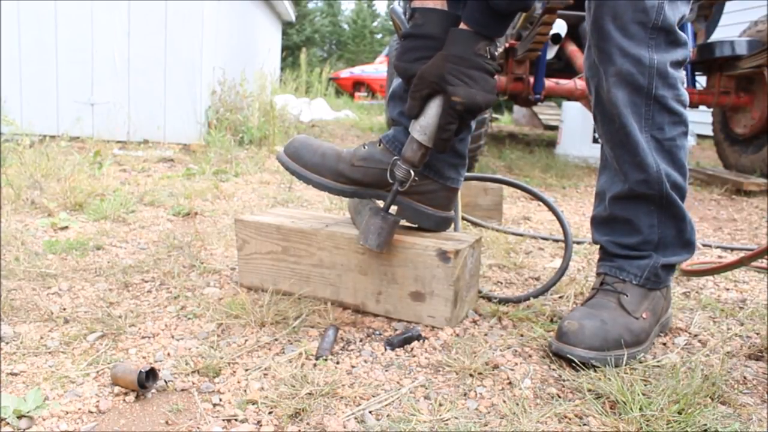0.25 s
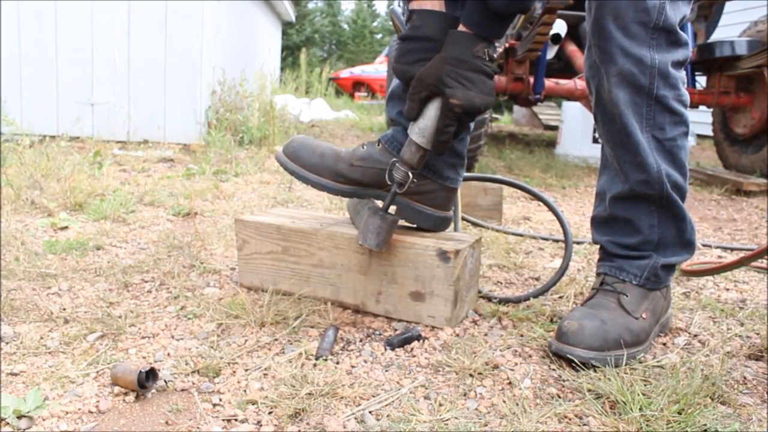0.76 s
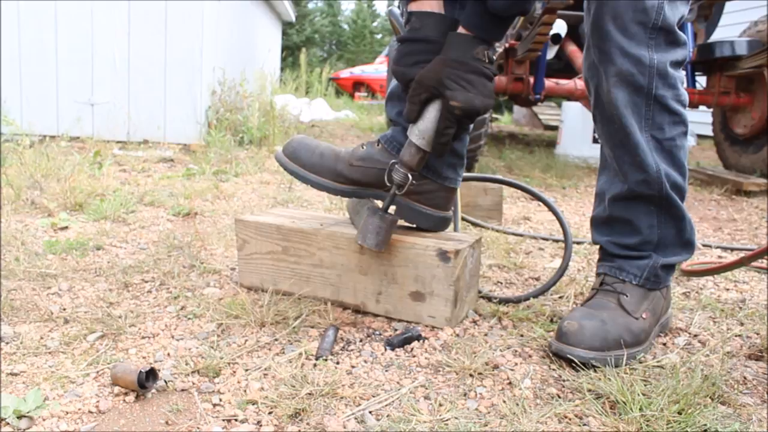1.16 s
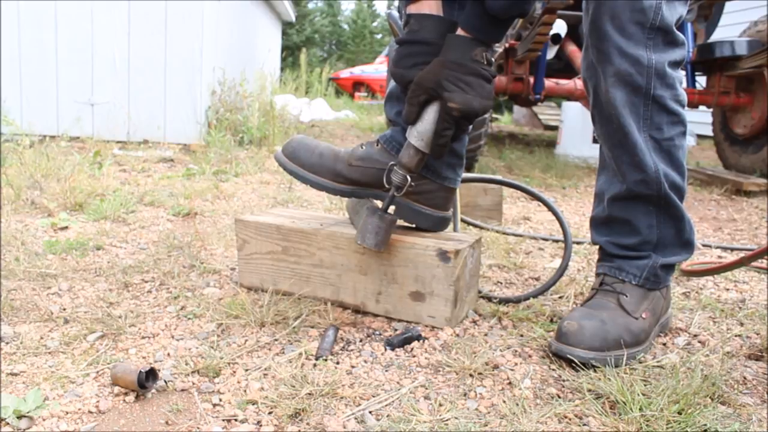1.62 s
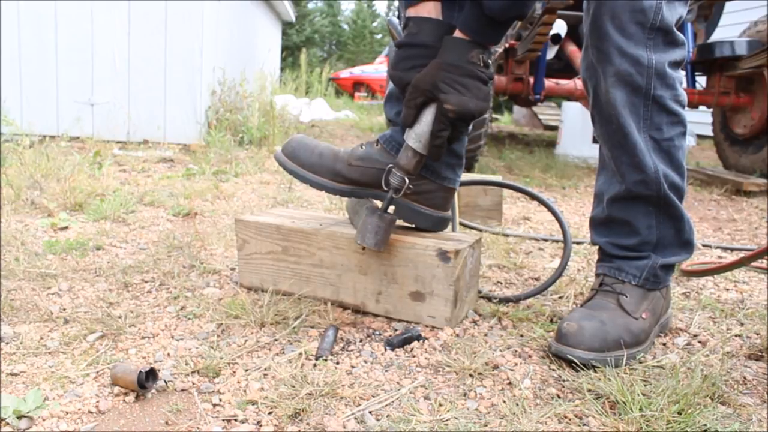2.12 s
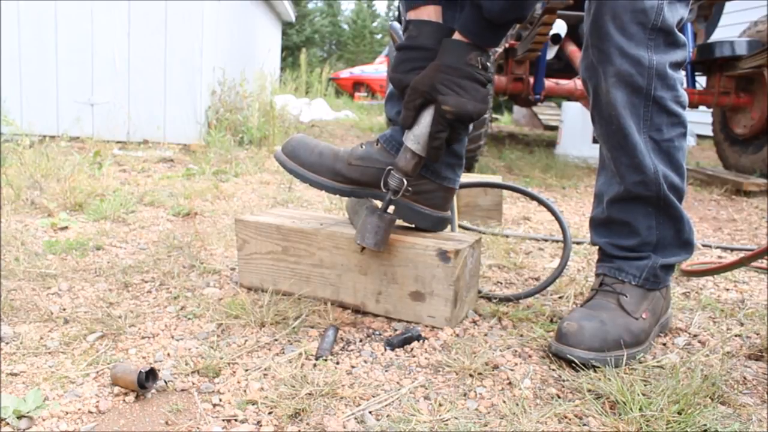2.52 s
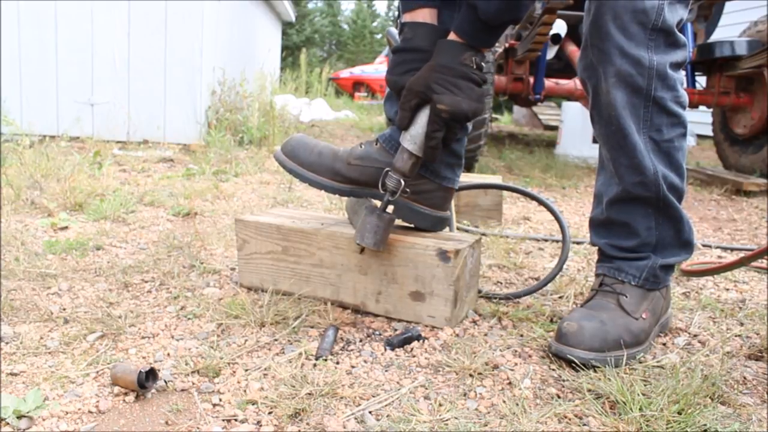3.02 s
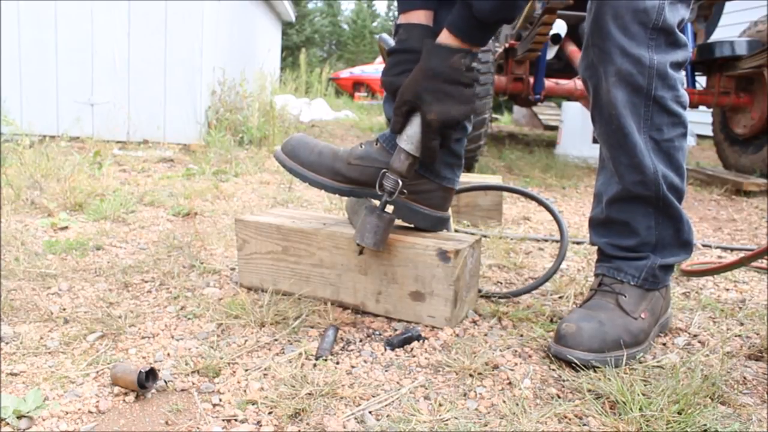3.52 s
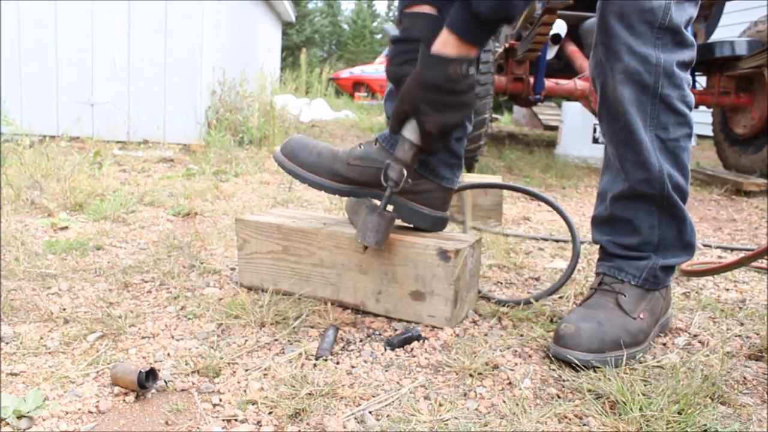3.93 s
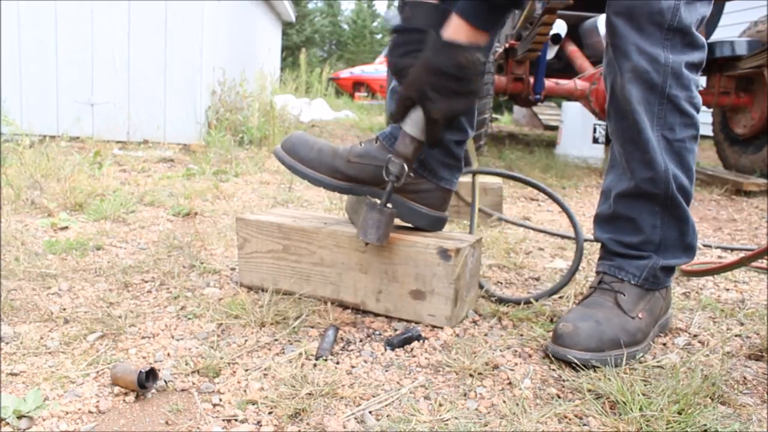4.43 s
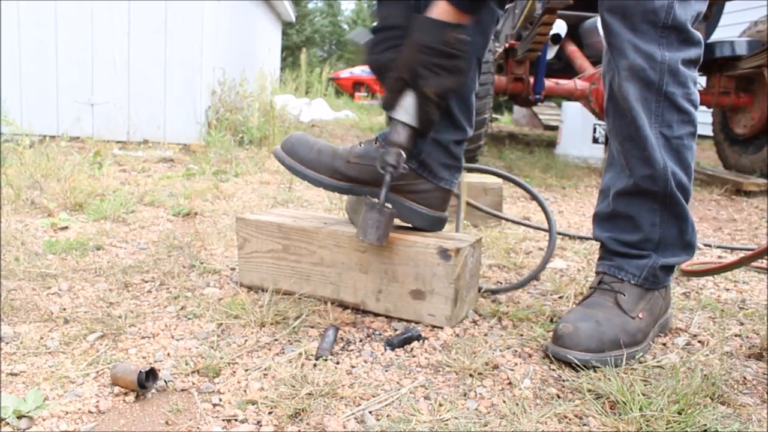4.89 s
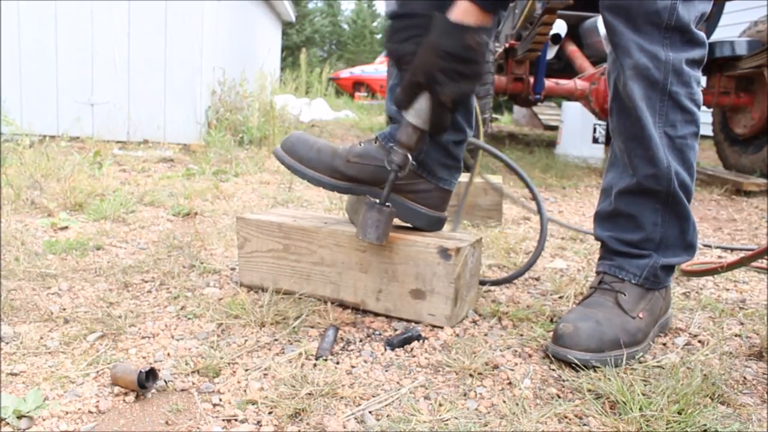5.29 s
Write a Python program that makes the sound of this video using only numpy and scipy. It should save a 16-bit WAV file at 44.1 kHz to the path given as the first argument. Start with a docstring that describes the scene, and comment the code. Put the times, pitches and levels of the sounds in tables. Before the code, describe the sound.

An air chisel hammers metal in one rapid burst outdoors, followed by light tool clinks, a soft wind rumble and a short air leak.

```python
"""Outdoors in a yard, a stereo microphone close to an air hammer chiselling a steel bushing liner.
Each stroke is a pop of exhaust air, then a steel blow that rattles and rings. The ring shifts as the
liner splits, and the wooden block under it booms as the chisel comes free. The hammer stops; the
automatic gain creeps back up on distant air, a gust on the microphone and handling clinks.
Last, air hisses briefly at the trigger."""
import sys
import numpy as np
from scipy import signal
from scipy.fft import rfft, irfft
from scipy.io import wavfile
from scipy.ndimage import uniform_filter1d, minimum_filter1d

SR = 44100
rng = np.random.default_rng(int(sys.argv[2]) if len(sys.argv) > 2 else 0)


def put_to_file(sound):
    """Save the sound as 16-bit audio at rate SR, in the file named by the first command-line argument."""
    columns = np.atleast_2d(sound).T  # one column per channel
    safe = np.clip(columns, -1, 1)
    whole_steps = np.round(safe * 32767)
    wavfile.write(sys.argv[1], SR, whole_steps.astype(np.int16))


N = 244755
T = np.arange(N) / SR
HZ = np.fft.rfftfreq(N, 1 / SR)
HAMMER_START_S, HAMMER_STOP_S = .0083, 3.46
NEAR_DB = 20.5  # boost of the close hammer, and the most the automatic gain can duck

# piston speed, sagging as the liner lets go: time_s, strokes_per_s
STROKE_RATE = [(0, 43.48), (.58, 42.81), (1.51, 40.95), (2.33, 41.3), (2.55, 39.16), (2.61, 40.53),
               (2.88, 40.36), (3.36, 37.51), (3.45, 30.56)]


def strokes():
    """The moment of each piston stroke, and how tightly the liner grips the chisel then."""
    # the liner's hold: time_s, grip (0-1)
    liner_grip = [(0, 0.96), (1.1, 0.94), (1.85, 0.76), (2.2, 0.69), (2.85, 0.4), (3.1, 0.26), (3.45, 0.1)]
    cycles = np.cumsum(follow(STROKE_RATE, T)) / SR
    cycles -= np.interp(HAMMER_START_S, T, cycles)
    times = np.interp(np.arange(np.interp(HAMMER_STOP_S, T, cycles)), cycles, T)
    return times, np.clip(follow(liner_grip, times), 0, 1)


def force_db(t, bite_half_s=.021):
    """Strength of the strokes: the lean on the hammer, with a short surge wherever the chisel bites."""
    # how hard the hammer is leaned on: time_s, level_db
    effort = [(0, -33.5), (.9, -34), (1.25, -33), (1.9, -33), (2.2, -35.3), (2.7, -34.5), (2.97, -36),
              (3.3, -34), (3.45, -37)]
    # runs of harder strokes: time_s, extra_db
    bites = [(.54, 1.5), (1.17, 2.2), (1.81, 1.5), (2.85, 2), (3.3, 0.5)]
    return follow(effort, t) + sum(db * np.exp(-.5 * ((t - s) / bite_half_s) ** 2) for s, db in bites)


def chisel(times, grip, lag_s=.0028, grip_lead_s=.0008, crack_db=9.5, modes_db=4, damping=.75):
    """The piston lands just after the pop: steel cracks and rings modes that shift as the cut advances."""
    # spectrum of a steel blow: frequency_hz, level_db
    crack_colour = [(60, -24.5), (300, -11.5), (800, -10.5), (1300, -8.5), (1900, -8.5), (2400, -5),
                    (3600, -4), (5500, -2), (7200, -3), (9000, -7), (11000, -10), (13000, -10.5),
                    (16000, -22.5)]
    # the crack's match between left and right: frequency_hz, likeness
    crack_likeness = [(2000, .9), (6000, .8), (14000, .65)]
    # modes of chisel and liner: pitch_hz, width_hz (before damping), level_db, loudest_s, span_s
    steel_modes = [(1590, 130, -47, 3.15, .35), (2335, 70, -41, .5, 1.0), (2440, 110, -38, 2.3, .8),
                   (2625, 80, -37, .55, .9), (2590, 110, -40, 2.8, .4), (3000, 50, -43, 1.8, .9),
                   (3495, 42, -38, 2.4, .5), (4295, 30, -38, .85, .4), (4245, 35, -36, 1.5, .36),
                   (4580, 120, -40, 1.2, .45), (4920, 80, -41, 1.3, .35), (5095, 80, -39, .35, .6),
                   (5287, 40, -40, .6, .65), (5660, 50, -35, .08, .35), (5655, 55, -39, .9, .5),
                   (5892, 45, -40, .6, .65), (6150, 90, -42, 3.35, .2), (6650, 120, -42, .3, .5),
                   (8150, 200, -43, 1.5, .5)]
    jitter, vary, snap_vary = rng.standard_normal((3, len(times)))
    landing = times + lag_s - grip_lead_s * grip + .0001 * jitter
    size = gain_of((1.08 - .56 * grip) * vary)  # a loose chisel is struck less evenly
    hiss_power = .13 * dying(clicks(times, np.ones(len(times))), .0093)  # from the exhaust port
    power = chatter(landing, size ** 2, grip) + hiss_power
    contact = while_running(np.sqrt(power) * noise_pair(read(crack_likeness, HZ)))
    snap_size = gain_of(6 * np.clip(snap_vary, -2, 1))
    snap = np.sqrt(dying(clicks(landing + .00072, snap_size ** 2), .00056)) * noise_pair(.74)
    snap = while_running(highpass(snap, 6000))  # the first touch is the brightest
    crack = while_running(colour(contact + gain_of(-7) * snap, crack_colour))
    out = gain_of(force_db(T) + crack_db) * crack
    kicks = while_running(clicks(landing + .0004, np.sqrt(size)))
    drive = kicks + gain_of(-16) * contact
    for hz, width, db, loudest_s, span_s in steel_modes:
        swell = 1 / (1 + ((T - loudest_s) / span_s) ** 2)
        out += gain_of(db + modes_db) * swell * while_running(resonate(drive, hz, damping * width))
    return out


def chatter(landing, power, grip, bounces=9, bounce_s=.00457, bounce_db=-7, tail_share=.34):
    """Power of the steel contact: one hard crack, then rebounds that are strongest while the liner grips."""
    delay = rng.gamma(2, bounce_s / 2, (len(landing), bounces))
    rebound_power = power * (.061 + grip ** 2) * gain_of(bounce_db) ** 2
    rebounds = rebound_power[:, None] * rng.exponential(1, delay.shape) * np.exp(-delay / .015)
    excess = (power + rebounds.sum(1)) / power  # crack and rebounds share the power of one blow
    hits = clicks(landing, power / excess) + clicks(landing[:, None] + delay, rebounds / excess[:, None])
    envelope = (1 - tail_share) * dying(hits, .00062) + tail_share * dying(hits, .01)
    return dying(envelope, .00063)  # rounds the attack


def exhaust(times, grip, return_phase=.475, return_db=-11, puff_db=-12, level_db=3):
    """A sharp pop of air at each stroke, a ragged puff behind it, a duller pop as the piston returns."""
    # spectrum of the pop with the chisel gripped: frequency_hz, level_db
    pop_gripped = [(40, -33), (82, -5.5), (125, -11), (210, 3), (250, -0.5), (295, 5), (355, -12),
                   (415, 6.5), (470, -3.5), (760, -14.5), (900, 1.5), (1050, -0.5), (1220, 0.5),
                   (1420, -20), (2400, -8), (4000, -19.5), (12000, -57.5)]
    # and with the chisel running free: frequency_hz, level_db
    pop_free = [(40, -43), (82, -18.5), (200, 3), (240, -1), (285, -1), (400, -1.5), (500, -4), (750, -13),
                (900, -4), (1150, -16), (1350, -30), (1600, 5.5), (2000, -22.5), (4000, -26), (12000, -33)]
    jitter, vary, return_jitter = rng.standard_normal((3, len(times)))
    times = times + .00004 * jitter
    size = gain_of(force_db(times) + .29 * vary)
    returns = times + return_phase / follow(STROKE_RATE, times) + .0001 * return_jitter
    air = highpass(noise_pair(.97), 900)
    out = 0
    for share, spectrum in ((grip, pop_gripped), (1 - grip, pop_free)):
        strength = size * share
        pops = clicks(times, strength) - gain_of(return_db) * dying(clicks(returns, strength), .000074)
        puffs = gain_of(puff_db) * np.sqrt(dying(clicks(times, strength ** 2), .006)) * air
        out = out + colour(pops + puffs, spectrum)
    out = highpass(out, 50, order=2)  # so small a port radiates no deep bass
    return gain_of(level_db) * np.sqrt(np.mean(size ** 2)) * while_running(out)


def wooden_block(times, grip, pitch_hz=407, width_hz=28, level_db=-15):
    """The less the liner holds the chisel, the more of each blow booms in the wood."""
    blows = clicks(times, (1 - grip) ** 2)
    return gain_of(force_db(T) + level_db) * while_running(resonate(blows, pitch_hz, width_hz))


def clinks(ring_db=-13, attack_s=.00032):
    """The chisel is shifted: short bursts of contact noise, each around its own pitch, ring the steel."""
    # clinks, scuffs and knocks on the block: start_s, level_db, centre_hz, spread_octaves, decay_s
    contacts = [(3.831, -35, 5000, 1.5, .008), (3.962, -30.5, 3000, 3, 0.0076),
                (3.965, -35.5, 398, 0.21, 0.016), (4.277, -35.5, 6000, 2.1, 0.011),
                (4.31, -32.5, 6000, 1.6, 0.027), (4.5552, -28, 2420, 1.3, 0.0076),
                (4.654, -24, 3750, 0.75, 0.0087), (4.557, -34.5, 900, 0.22, 0.013),
                (4.722, -35, 413, 0.3, 0.013), (4.78, -31, 8000, 1.2, 0.0043),
                (5.012, -32, 5600, 0.91, .006), (5.051, -30, 2100, 0.53, .007),
                (5.222, -30.5, 3050, 1.8, 0.014), (5.252, -32.5, 2560, 1.8, 0.012),
                (5.3, -28, 6150, 0.28, 0.0072)]
    # modes of the loose chisel: pitch_hz, width_hz, level_db
    loose_modes = [(1313, 9.1, -2), (2800, 17, -2), (4040, 17, -9), (4221, 30, -15), (5900, 39, -8)]
    out, t = np.zeros((2, N)), np.arange(SR // 4) / SR
    octaves = np.log2(np.fft.rfftfreq(len(t), 1 / SR) + 1)
    for start_s, db, hz, spread, decay_s in contacts:
        noise = rng.standard_normal(len(t)) + .5 * rng.standard_normal((2, len(t)))
        band = np.exp(-.5 * ((octaves - np.log2(hz)) / spread) ** 2) / (1 + 2 ** octaves / hz)
        envelope = np.exp(-t / decay_s) * (1 - np.exp(-t / attack_s))
        burst = gain_of(db) * envelope * unit_rms(irfft(rfft(noise) * band, len(t)))
        start = round(start_s * SR)
        out[:, start:start + len(t)] += burst[:, :N - start]
    ring = sum(gain_of(db + ring_db) * unit_rms(resonate(out, hz, width)) for hz, width, db in loose_modes)
    return out + np.std(out) * ring


def trigger_leak(start_s=5.445, level_db=-29, attack_s=.047, hold_s=.027, release_s=.032):
    """Air leaks past the half-pressed trigger: a swell of hiss with a faint whistle."""
    # spectrum of the valve's hiss: frequency_hz, level_db
    hiss_colour = [(500, -38), (2000, -10), (3700, -12), (3980, 9.5), (4300, -5), (5000, -1.5),
                   (6400, -4.5), (8300, -9), (10000, -18), (16000, -32)]
    opening = np.interp(T, start_s + np.cumsum([0, attack_s, hold_s, release_s]), [0, 1, 1, 0])
    return gain_of(level_db) * opening * unit_rms(colour(noise_pair(.57), hiss_colour))


def yard(x, near_db=-12, vehicle_db=-16, far_db=-20):
    """Quick scatter from ground and boots, duller echoes off a vehicle, a faint tail from shed and trees."""
    # reverberation of the yard: frequency_hz, t60_s
    decay_times = [(150, 0.11), (500, 0.3), (2000, 0.086), (6000, 0.022), (15000, 0.033)]
    t = np.arange(SR // 2) / SR
    near = rng.standard_normal((2, len(t))) * np.exp(-t / .0024) * (t > .001)
    near = unit_rms(highpass(near, 1500))  # small things scatter only treble
    vehicle = unit_rms(rng.standard_normal(len(t)) * np.exp(-t / .007) * (t > .005))
    vehicle = signal.lfilter(*signal.butter(1, [450, 1800], "band", fs=SR), vehicle)
    hz, age_s, tail = signal.stft(rng.standard_normal((2, len(t))) * (t > .012), SR, nperseg=256)
    tail *= gain_of(-60 * age_s / read(decay_times, hz)[:, None])
    far = unit_rms(signal.istft(tail, SR, nperseg=256)[1][:, :len(t)])
    echoes = gain_of(near_db) * near + gain_of(vehicle_db) * vehicle + gain_of(far_db) * far
    return x + convolve(x, echoes / np.sqrt(len(t)))


def wind(peak_s=4.6, peak_db=-33, rise_db_per_s=34, fall_db_per_s=14.5, breeze_db=-58, flutter_db=2.5):
    """One gust swells out of the breeze and dies away, its eddies rumbling on the microphone."""
    # spectrum of the rumble: frequency_hz, level_db
    rumble_colour = [(8, -12), (26, 4), (45, -2), (65, -4.5), (100, -28), (160, -19), (400, -56),
                     (2000, -85)]
    gust_db = peak_db - np.maximum((peak_s - T) * rise_db_per_s, (T - peak_s) * fall_db_per_s)
    level_db = np.maximum(gust_db, breeze_db) + flutter_db * wander(hz=8)
    return gain_of(level_db) * unit_rms(colour(noise_pair(.38), rumble_colour))


def distant_air(level_db=-38.5, waver_db=1.28, right_db=2.5):
    """A slightly wavering wash of distant air, stronger on the right."""
    # spectrum of the wash: frequency_hz, level_db
    wash_colour = [(59, -35), (100, -2.5), (307, -4.5), (349, -7), (414, -10.5), (450, -6.5), (580, -5.5),
                   (659, -3.5), (986, -9.5), (1600, -8.5), (2030, -17.5), (2840, -11), (3830, -11.5),
                   (15800, -33.5)]
    # its match between left and right: frequency_hz, likeness
    wash_likeness = [(60, 0.049), (250, 0.78), (640, 0.26), (1400, 0.7), (3100, 0.63), (7000, 0.14),
                     (15000, 0.17)]
    wash = unit_rms(colour(noise_pair(read(wash_likeness, HZ)), wash_colour))
    return wash * gain_of(level_db + waver_db * wander(hz=7.7)) * gain_of([[-right_db], [right_db]])


def gain_of(db):
    """Decibels to amplitude."""
    return 10 ** (np.asarray(db) / 20)


def unit_rms(x):
    """Scales to rms 1."""
    return x / np.sqrt(np.mean(x ** 2) + 1e-20)


def while_running(x):
    """Scales to rms 1 over the time the hammer runs."""
    return x / np.sqrt(np.mean(x[..., T < HAMMER_STOP_S] ** 2) + 1e-20)


def read(points, hz):
    """A spectrum table at hz, on a log-frequency axis."""
    f, value = np.transpose(points)
    return np.interp(np.log(hz + 1), np.log(f + 1), value)


def follow(rows, t):
    """A curve table at times t."""
    return np.interp(t, *np.transpose(rows))


def convolve(x, response):
    """Convolution along time, cut to the scene."""
    return signal.fftconvolve(np.atleast_2d(x), np.atleast_2d(response), axes=1)[:, :N]


def colour(x, points, size=4096):
    """Minimum-phase filter with the given spectrum."""
    log_gain = np.log(gain_of(read(points, abs(np.fft.fftfreq(size, 1 / SR)))))
    response = np.fft.ifft(np.exp(np.conj(signal.hilbert(log_gain)))).real
    return convolve(x, response[:size // 2])


def highpass(x, hz, order=1):
    """Rolls off the sound below hz."""
    return signal.lfilter(*signal.butter(order, hz, "high", fs=SR), x)


def noise_pair(likeness):
    """White noise in two channels with the given correlation."""
    a, b = rfft(rng.standard_normal((2, N)))
    return irfft(np.array([a, likeness * a + np.sqrt(1 - likeness ** 2) * b]), N)


def wander(hz):
    """Slow random drift of rms 1, changing at up to about hz."""
    return unit_rms(irfft(rfft(rng.standard_normal(N)) * np.exp(-HZ / hz), N))


def clicks(times, sizes):
    """A train of one-sample clicks."""
    samples = np.clip(np.round(np.ravel(times) * SR), 0, N - 1).astype(int)
    return np.bincount(samples, np.ravel(sizes), N)


def dying(train, decay_s):
    """Each click becomes an exponential decay of the same area."""
    r = np.exp(-1 / (SR * decay_s))
    return signal.lfilter([1 - r], [1, -r], train)


def resonate(x, hz, width_hz):
    """One ringing mode."""
    r = np.exp(-np.pi * width_hz / SR)
    return signal.lfilter([1, 0, -1], [1, -2 * r * np.cos(2 * np.pi * hz / SR), r * r], x)


def scene(right_delay_s=5.2e-5, right_db=.5):
    """The tool in the open yard, nearer the left microphone port and a touch louder in the right."""
    times, grip = strokes()
    hammer = exhaust(times, grip) + chisel(times, grip) + wooden_block(times, grip)
    tool = gain_of(NEAR_DB) * hammer + clinks() + trigger_leak()
    tool[1] = gain_of(right_db) * irfft(rfft(tool[1]) * np.exp(-2j * np.pi * HZ * right_delay_s), N)
    return yard(tool) + distant_air() + wind()


def record(dry, threshold_db=-13.5, hold_s=.19, recover_db_per_s=35, cutoff_hz=16000):
    """Automatic gain of limited range ducks at once, holds and recovers slowly; then a band limit."""
    peak_db = 20 * np.log10(abs(dry).max(0) + 1e-9)
    over_db = -minimum_filter1d(-np.clip(peak_db - threshold_db, 0, NEAR_DB), size=1001)
    half = round(hold_s * SR / 2)
    held_db = -minimum_filter1d(-over_db, size=2 * half + 1, origin=half)  # largest recent excess
    recovery_db = T * recover_db_per_s
    duck_db = np.maximum.accumulate(held_db + recovery_db) - recovery_db
    ducked = dry / gain_of(uniform_filter1d(duck_db, size=100))
    lowpass = signal.firwin(511, cutoff_hz, window=("kaiser", 9), fs=SR)
    return signal.oaconvolve(ducked, lowpass[None], "same")


dry = scene()
out = record(dry)
put_to_file(out)
```